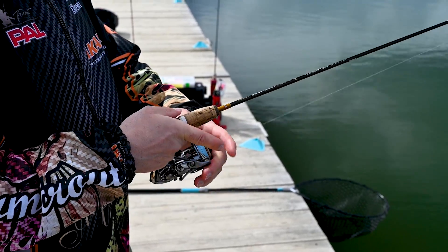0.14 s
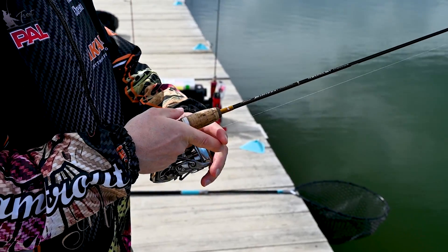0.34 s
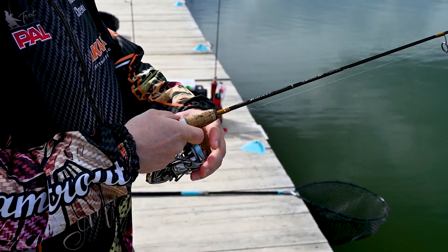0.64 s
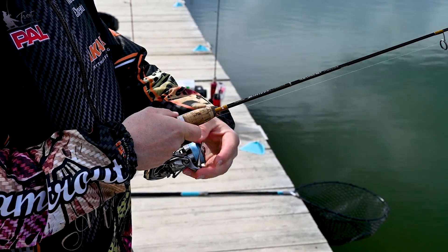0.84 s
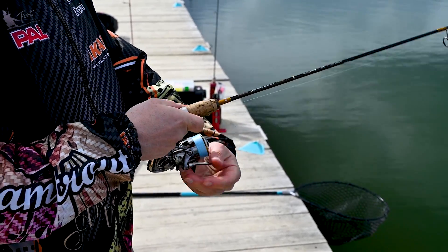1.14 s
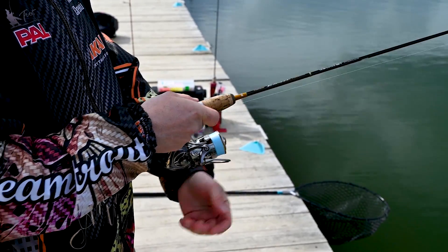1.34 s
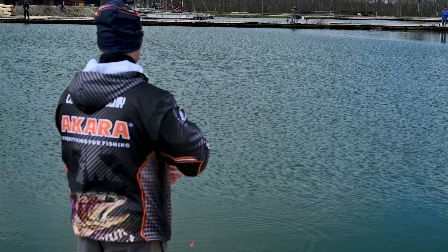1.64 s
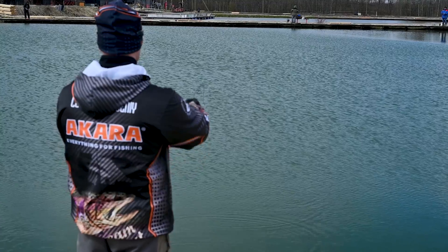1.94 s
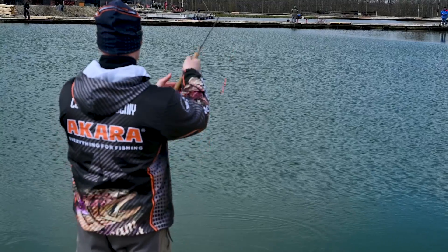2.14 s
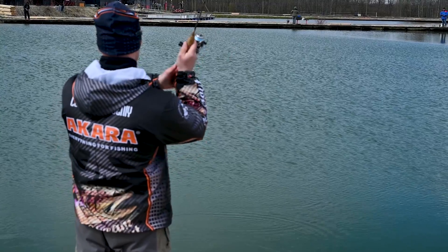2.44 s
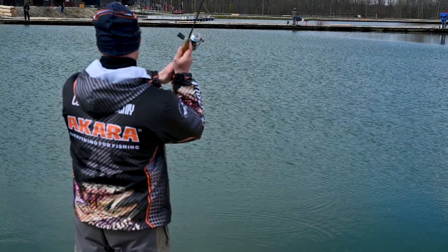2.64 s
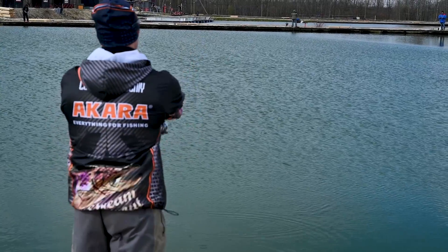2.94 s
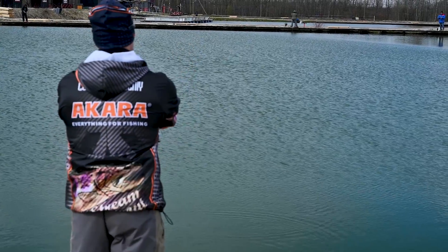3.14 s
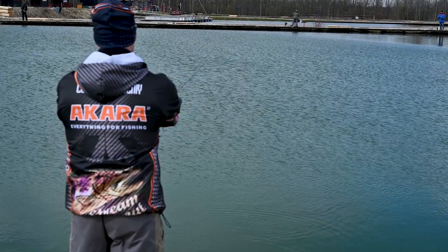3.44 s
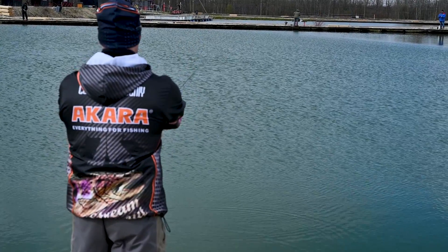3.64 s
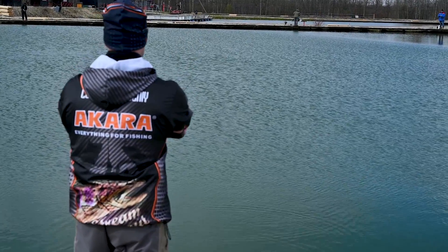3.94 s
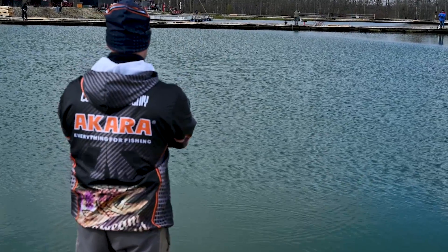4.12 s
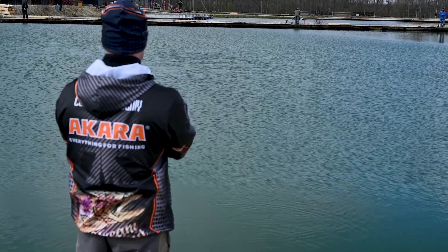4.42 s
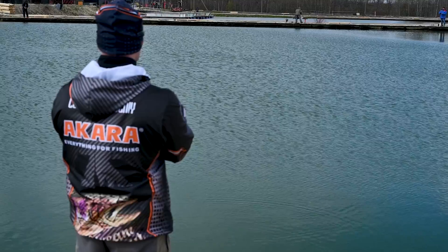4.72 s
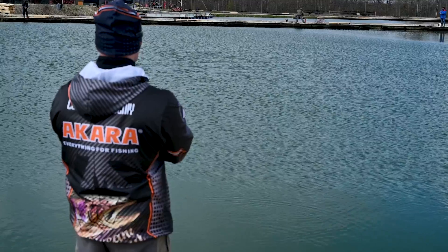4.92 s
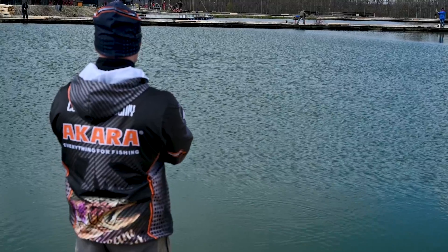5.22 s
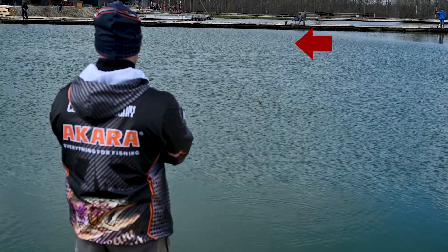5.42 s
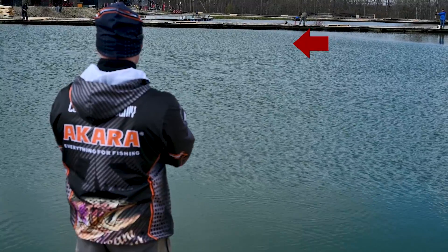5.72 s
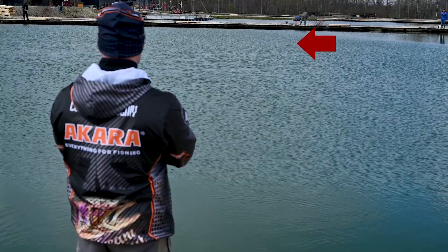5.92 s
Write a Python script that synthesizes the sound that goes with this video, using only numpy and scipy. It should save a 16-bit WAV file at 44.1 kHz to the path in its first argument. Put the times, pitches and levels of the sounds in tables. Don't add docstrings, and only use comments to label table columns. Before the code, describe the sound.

Two crisp bursts of metallic reel clicks, a faint sleeve rustle, then a violent overloaded casting crack and line hiss fading over quiet water.

```python
import sys
import numpy as np
from scipy import signal
from scipy.fft import rfft, irfft, next_fast_len
from scipy.io import wavfile
from scipy.ndimage import uniform_filter1d, map_coordinates

SR = 44100
rng = np.random.default_rng(int(sys.argv[2]) if len(sys.argv) > 2 else 0)


def unload_wav(signal):
    wavfile.write(
        sys.argv[1],
        SR,
        np.round(np.clip(np.atleast_2d(signal).T, -1, 1) * 32767).astype(np.int16),
    )


def volts(x):
    e = np.asarray(x, float) / 20
    return 10 ** e


N = 267687


def unit(x):
    return x / np.sqrt(np.mean(x ** 2) + 1e-20)


def along(points, hz):
    point_hz, value = np.transpose(points)
    return np.interp(np.log(hz + 1), np.log(point_hz + 1), value)


def gains(*tables):
    t, total = np.arange(N) / SR, 0
    for rows in tables:
        s, *columns = np.transpose(rows)
        levels_db = [np.interp(t, s, column, left=-200, right=-200) for column in columns]
        total = total + volts(levels_db)
    return total


def wobble(knots_per_s):
    knots = rng.standard_normal(int(N * knots_per_s / SR) + 4)
    return map_coordinates(knots, [np.arange(N) * knots_per_s / SR])


def rush(spectrum, alike=((60, 1),), patchy_db=2):
    z = signal.stft(rng.standard_normal((2, N)), nperseg=512)[2]
    field = uniform_filter1d(rng.standard_normal(z.shape[1:]), size=6, axis=0)
    field = uniform_filter1d(field, size=8, axis=1)
    pair = signal.istft(z * volts(patchy_db * unit(field)), nperseg=512)[1][:, :N]
    size = next_fast_len(N)
    hz = np.fft.rfftfreq(size, 1 / SR)
    turn = np.arccos(np.clip(along(alike, hz), -1, 1)) / 2
    shape = volts(along(spectrum, hz)) * [np.cos(turn), np.sin(turn)]
    mid, side = irfft(rfft(pair, size) * shape, size)[:, :N]
    return unit(np.array([mid + side, mid - side]))


def ring(modes, t, scatter_db=4):
    total = 0
    for hz, db, t60 in modes:
        decay = volts(db + scatter_db * rng.normal() - 60 * t / t60)
        total = total + decay * np.sin(2 * np.pi * hz * t)
    return total


def burst(t, lo_hz, hi_hz, t60):
    band = signal.butter(2, [lo_hz, min(hi_hz, .49 * SR)], "bandpass", fs=SR, output="sos")
    return unit(signal.sosfilt(band, rng.standard_normal(len(t)))) * volts(-60 * t / t60)


def add(track, s, sound):
    start = round(s * SR)
    part = track[..., start:start + sound.shape[-1]]
    part += sound[..., :part.shape[-1]]


# time in seconds, rumble level in dB, breeze level in dB.
AIR_LEVELS = [
    [(0.0, -70, -67), (0.036, -67, -62), (0.15, -78, -77), (0.3, -79.5, -78.5)],
    [(0.95, -77, -72), (1.064, -82, -75.5), (1.28, -76.5, -77), (1.33, -65, -64.5), (1.426, -58.5, -62),
     (1.486, -67.5, -66), (1.726, -57, -64.5), (1.872, -58, -64), (2.15, -68, -63), (2.318, -70, -62.5),
     (2.426, -56.5, -62), (2.546, -62.5, -62), (2.616, -71.5, -70.5), (2.834, -71, -69.5),
     (2.9, -57, -70.5)],
    [(4.7, -68, -75.5), (4.932, -62, -70.5), (5.02, -62, -68), (5.276, -66, -74.5), (5.508, -66, -69),
     (5.698, -64, -74.5), (5.878, -63, -69), (6.07, -75.5, -76.5)],
]
# frequency in Hz, density in dB per Hz.
RUMBLE_SPECTRUM = [(12, -31.5), (20, -1.5), (49, 3.5), (151, -8.5), (204, -10.5), (350, -22), (460, -47.5),
                   (770, -120)]
BREEZE_SPECTRUM = [(120, -30), (200, -3.5), (425, -6), (550, -5.5), (829, -5.5), (1290, -13), (1820, -14),
                   (2850, -25.5), (12000, -38), (15600, -68), (22000, -120)]


def wind():
    rumble, breeze = gains(np.vstack(AIR_LEVELS))
    low = rumble * volts(2.5 * wobble(14)) * rush(RUMBLE_SPECTRUM, patchy_db=2.5)
    high = breeze * volts(1.1 * wobble(12)) * rush(BREEZE_SPECTRUM, patchy_db=2.7)
    return low + high


# time in seconds, rub level in dB, sheen level in dB.
SLEEVE_LEVELS = [
    [(0.0, -80, -100), (0.054, -81, -105), (0.066, -103, -109), (0.13, -81, -99), (0.136, -99, -109),
     (0.3, -100, -109)],
    [(1.15, -100, -109), (1.208, -100, -107), (1.282, -78, -83.5), (1.362, -77, -80.5), (1.44, -76, -86),
     (1.47, -68.5, -73), (1.484, -75, -85.5), (1.554, -100, -91.5), (1.804, -71.5, -85),
     (1.932, -70.5, -86), (2.07, -61, -72.5), (2.258, -58, -66.5), (2.298, -64, -68.5),
     (2.318, -60.5, -69.5), (2.514, -62.5, -73), (2.742, -76.5, -81.5), (2.89, -52.5, -61.5),
     (2.92, -45.5, -54.5)],
]
# frequency in Hz, density in dB per Hz.
RUB_SPECTRUM = [(760, -38.5), (1300, -8.5), (1780, -1.5), (2090, -7.5), (2190, -2.5), (2340, -8),
                (2800, -7), (3190, -11.5), (3430, -19.5), (3790, -15), (4500, -19.5), (5850, -52),
                (9900, -120)]
SHEEN_SPECTRUM = [(2350, -29.5), (4000, -2.5), (4280, -7), (5610, -2), (6580, -5.5), (8510, 0),
                  (11500, -7.5), (12600, -11), (14700, -11), (15700, -14)]


def sleeve():
    rub, sheen = gains(*SLEEVE_LEVELS)
    folds = volts(1.2 * wobble(30))
    cloth = rub * rush(RUB_SPECTRUM, patchy_db=1.5)
    return folds * (cloth + sheen * rush(SHEEN_SPECTRUM, patchy_db=1.5))


# start in seconds, peak in dB, pitch in Hz, bright edge in dB, t60 in seconds.
TACKLE_TICKS = [(1.336, -59.5, 716, -11.5, 0.03), (1.465, -49, 1280, -18.5, 0.03),
                (1.853, -51, 1250, -28, 0.03), (3.763, -36.5, 1390, -22, 0.03),
                (4.276, -47.5, 904, -19, 0.03), (4.458, -48.5, 864, -30.5, 0.03),
                (4.514, -47, 703, -33, 0.03), (4.934, -54.5, 713, -25.5, 0.03),
                (5.314, -56.5, 703, -24.5, 0.03), (5.396, -60.5, 703, -11, 0.03),
                (5.457, -39.5, 810, -2.5, 0.03), (5.484, -54, 824, -21.5, 0.03),
                (5.599, -64.5, 746, -4, 0.03), (5.641, -45.5, 904, -2, 0.03),
                (5.828, -54.5, 703, -34, 0.03), (5.844, -54.5, 746, -28, 0.03)]


def tackle():
    out, t = np.zeros(N), np.arange(SR // 8) / SR
    rise = 1 - np.exp(-t / .001)
    for s, db, hz, top_db, t60 in TACKLE_TICKS:
        knock = burst(t, .8 * hz, 1.25 * hz, t60) * volts(-8) + burst(t, 500, 5000, t60) * volts(-9)
        edge = volts(top_db - 4.5) * burst(t, 4000, 15500, .7 * t60)
        add(out, s, volts(db) * rise * (knock + edge))
    return out


# start in seconds, peak in dB, then body, crack and wire in dB re peak.
BAIL_CLICKS = [(0.327, -40.5, 5.5, -7.5, -26.5), (0.353, -12.5, -5, -16.5, -26),
               (0.381, -4.5, -18, -7, -21.5), (0.386, -11, -7, -17.5, -21), (0.392, -15.5, -13, -14, -18),
               (0.428, -12.5, -8.5, -11, -27.5), (0.443, -9, -6.5, -13.5, -27.5),
               (0.451, -5, -10.5, -11.5, -21.5), (0.454, -5.5, -11.5, -11.5, -20),
               (0.46, -1.5, -12, -16, -25.5), (0.467, -3, -16.5, -13, -9), (0.474, -1.5, -16, -11, -9),
               (0.479, -6, -11.5, -6, -19), (0.705, -22.5, -9.5, -7, -15), (0.716, -13.5, -17, -10.5, -18),
               (0.724, -13.5, -7.5, -14.5, -25), (0.761, -6, -7, -16.5, -25),
               (0.77, -14.5, -15.5, -12, -16), (0.792, -17, -6.5, -13.5, -12.5),
               (0.833, -9, -15.5, -8.5, -19.5), (0.837, -2, -20, -8, -24.5),
               (0.846, -2.5, -17, -7.5, -19.5), (0.851, 3, -11.5, -12, -19),
               (0.865, -0.5, -16.5, -16.5, -17.5), (0.877, -11, -11, -0.5, -11.5),
               (0.893, 4, -11, -10.5, -21), (0.909, -3, -11, -10, -27)]
# frequency in Hz, level in dB, t60 in seconds.
HOUSING_MODES = [(1180, -0.5, .03), (1310, 0, .03), (1050, -7, .03), (650, -13.5, .03), (250, -16.5, .04),
                 (2450, -4.5, .02)]
ARM_MODES = [(2920, -6.5, .02), (4370, -1, .03), (5790, 1, .02), (7090, -1, .015), (8700, -7.5, .015)]
WIRE_MODES = [(10800, -7, .02), (11700, 0, .04), (13900, -5, .02)]


def bail_clicks():
    out, t = np.zeros(N), np.arange(SR // 8) / SR
    rise = 1 - np.exp(-t / .0004)
    for s, db, body_db, crack_db, wire_db in BAIL_CLICKS:
        body = volts(body_db - 3.5) * ring(HOUSING_MODES, t)
        crack = volts(crack_db - 5) * (ring(ARM_MODES, t) + 1.5 * burst(t, 1800, 10000, .018))
        wire = volts(wire_db - 2.5) * (ring(WIRE_MODES, t) + .8 * burst(t, 9000, 15500, .015))
        add(out, s, volts(db) * rise * (body + crack + wire))
    return out


# start in seconds, frequency in Hz, level in dB, t60 in seconds.
SPOOL_RINGS = [
    (.478, 1922, -15, .12),
    (.478, 4400, -30, .2),
    (.478, 1180, -25, .1),
]


def spool_rings():
    out, t = np.zeros(N), np.arange(SR // 4) / SR
    for s, hz, db, t60 in SPOOL_RINGS:
        add(out, s, ring([(hz, db, t60)], t, scatter_db=0))
    return out


# time in seconds, body level in dB, grit level in dB.
SPRING_LEVELS = [
    [(0.31, -84, -85.5), (0.356, -23.5, -31.5), (0.372, -40, -45.5), (0.384, -22.5, -21),
     (0.412, -44.5, -42), (0.462, -16, -16), (0.578, -61, -52), (0.684, -57, -63.5), (0.7, -47.5, -63.5)],
    [(0.7, -44.5, -47), (0.722, -35, -32), (0.822, -36, -35), (0.854, -14.5, -13), (0.874, -30, -27),
     (0.914, -14.5, -13.5), (0.94, -52, -57)],
]
# frequency in Hz, density in dB per Hz.
GRIT_SPECTRUM = [(59, -51.5), (100, -21), (255, -12.5), (433, -17.5), (721, -17.5), (1080, -3), (1330, -3),
                 (1450, -5), (2580, -7), (4290, -8.5), (13500, -22.5), (15000, -25), (16000, -42)]


def spring_scrape():
    body, grit = gains(*SPRING_LEVELS)
    chatter = volts(3.5 * wobble(220))
    hum = rush([(500, -29), (900, -7.5), (1200, 0.1), (1500, -8), (2500, -28)])[0]
    return chatter * (volts(-5.5) * body * hum + volts(-2) * grit * rush(GRIT_SPECTRUM)[0])


def reel():
    hand = np.clip((.934 - np.arange(N) / SR) / .012, 0, 1)
    return (bail_clicks() + spool_rings() + spring_scrape()) * hand


# start in seconds, peak in dB, pitch in Hz.
GUIDE_SLAPS = [(3.035, -30, 1640), (3.131, -31, 1270), (3.177, -24, 2050), (3.195, -22, 748),
               (3.211, -23, 1040), (3.218, -27, 996), (3.237, -24.5, 1110), (3.261, -36, 956)]


def guide_slaps():
    out, t = np.zeros((2, N)), np.arange(SR // 10) / SR
    for s, db, hz in GUIDE_SLAPS:
        add(out, s, (1 - np.exp(-t / .002)) * ring([(hz, db + 0.5, .03)], t, scatter_db=1))
    return out


# time in seconds, thump level in dB, hiss level in dB, fizz level in dB.
TAIL_LEVELS = [(2.92, -24, -38, -28.5), (2.93, -31, -11, -23.5), (2.93, -7.5, -21, -18.5),
               (2.95, -21.5, -32, -24.5), (2.95, -20, -29, -31), (2.97, -20.5, -37, -31),
               (2.99, -27.5, -39.5, -32.5), (3.0, -29.5, -40.5, -39.5), (3.1, -41, -41.5, -41),
               (3.17, -46, -35.5, -38), (3.2, -36.5, -34.5, -38), (3.28, -42.5, -39.5, -45),
               (3.41, -54, -45, -53.5), (4.05, -69.5, -60, -78), (4.66, -69, -67.5, -88.5),
               (4.77, -76, -76, -87), (5.0, -65.5, -74.5, -97.5)]
# frequency in Hz, density in dB per Hz.
THUMP_SPECTRUM = [(18, -44), (30, -14), (38, -13.5), (162, -1.5), (203, -6.5), (241, -0.5), (282, -8),
                  (497, -16), (700, -16), (910, -46), (1540, -120)]
HISS_SPECTRUM = [(240, -39), (400, -8.5), (585, -11), (708, -5), (1020, -1), (1200, -4.5), (1950, -1),
                 (3800, -10), (5000, -17), (6500, -48), (11000, -120)]
FIZZ_SPECTRUM = [(2060, -28.5), (3500, -3), (4870, -8.5), (6830, -3.5), (8190, -11), (10300, -12),
                 (15100, -24.5), (16100, -34), (16500, -66)]
# frequency in Hz, left-right likeness from -1 to 1.
TAIL_LIKENESS = [(60, 0.72), (130, 0.92), (290, 0.85), (640, 0.8), (1410, 0.76), (3100, 0.5), (6820, 0.13),
                 (15000, -0.18)]


def line_tail():
    thump, hiss, fizz = gains(TAIL_LEVELS)
    flutter = volts(1.6 * wobble(45))
    roll = thump * volts(2.5 * wobble(30)) * rush(THUMP_SPECTRUM, TAIL_LIKENESS, patchy_db=1.5)
    line = hiss * rush(HISS_SPECTRUM, TAIL_LIKENESS, patchy_db=1.77)
    line = line + fizz * rush(FIZZ_SPECTRUM, TAIL_LIKENESS, patchy_db=2.24)
    return roll + flutter * line


# start in seconds, peak in dB, left minus right in dB.
CRACK_SHOCKS = [
    (2.928, 11, -3.5),
    (2.9313, 9.5, 1.5),
    (2.9345, 2, 2),
    (2.9525, -4.5, 3),
]


def rod_crack():
    out, t = np.zeros((2, N)), np.arange(SR // 10) / SR
    u = t / .0009
    for s, db, pan_db in CRACK_SHOCKS:
        level = volts(db + np.array([[pan_db], [-pan_db]]) / 2)
        add(out, s, -level * (1 - u) * np.exp(-u / 1.3))
    lean = volts([[2.1], [-2.1]])
    mid, side = [burst(t, 130, 500, .045) * volts(2) + burst(t, 600, 16000, .03) * volts(-5) for _ in range(2)]
    add(out, 2.9285, lean * (.75 * mid + .4 * np.array([side, -side])))
    return out


def cast():
    wide = rod_crack() + line_tail() + guide_slaps()
    ceiling = np.array([[.64], [.46]])
    return wide / (1 + np.abs(wide / ceiling) ** 6) ** (1 / 6)


def scene():
    return wind() + sleeve() + tackle() + reel() + cast()


def band_limit(x):
    return signal.sosfilt(signal.butter(12, 16800, fs=SR, output="sos"), x)


# time in seconds, left and right in full scale.
WIDE_OFFSET = [
    (2.886, 0, 0),
    (2.9, .0215, .032),
]


def record(dry):
    s, *level = np.transpose(WIDE_OFFSET)
    x = dry + np.array([np.interp(np.arange(N) / SR, s, v) for v in level])
    limited = x / (1 + np.abs(x / .9) ** 8) ** (1 / 8)
    return band_limit(limited)


dry = scene()
out = record(dry)
unload_wav(out)
```